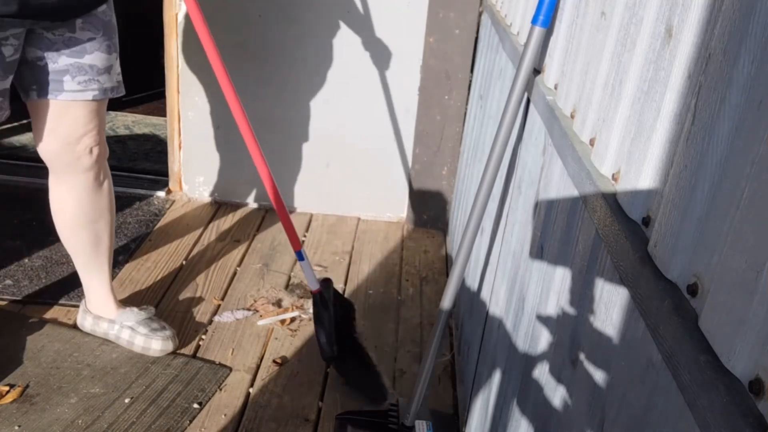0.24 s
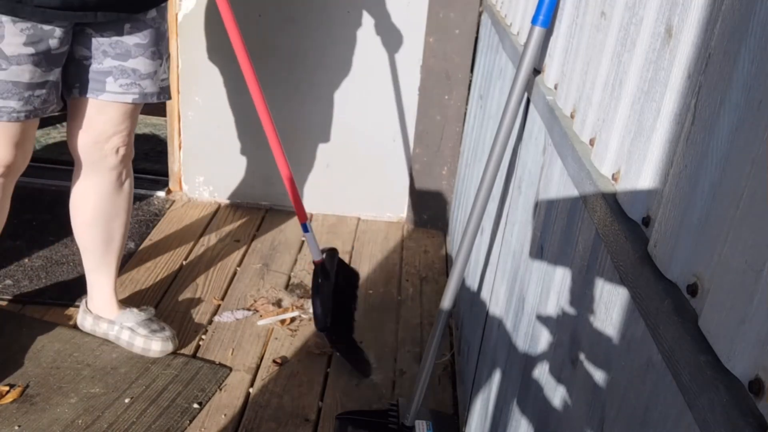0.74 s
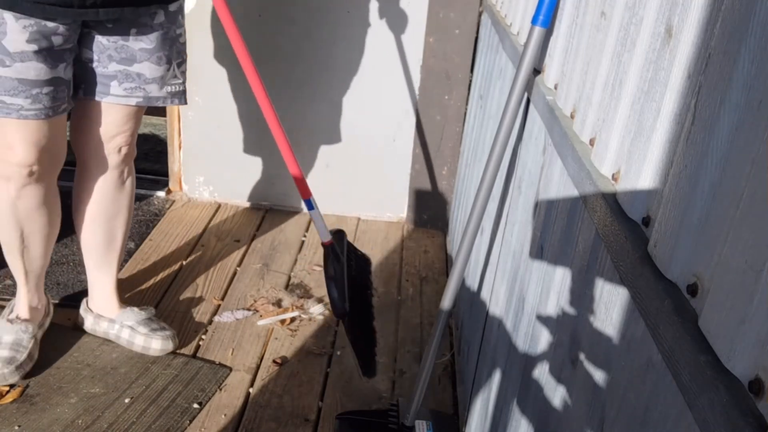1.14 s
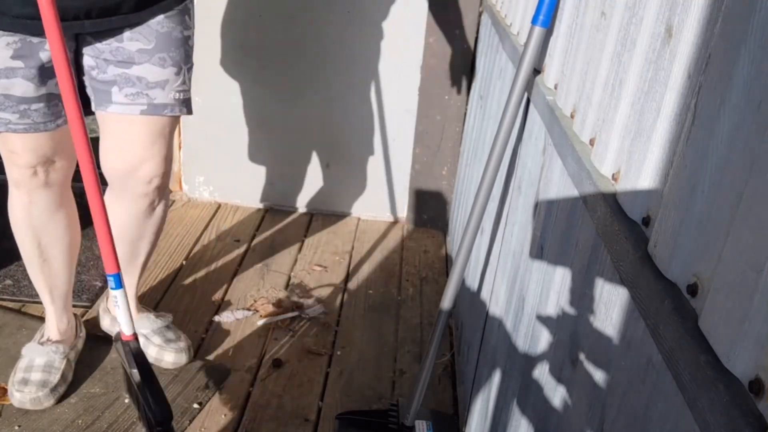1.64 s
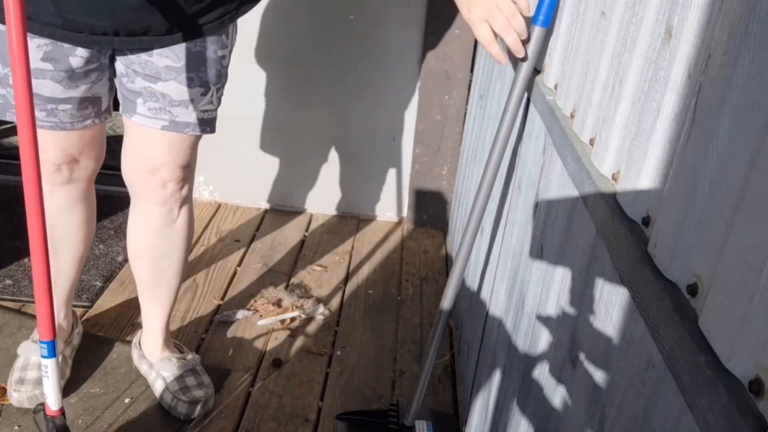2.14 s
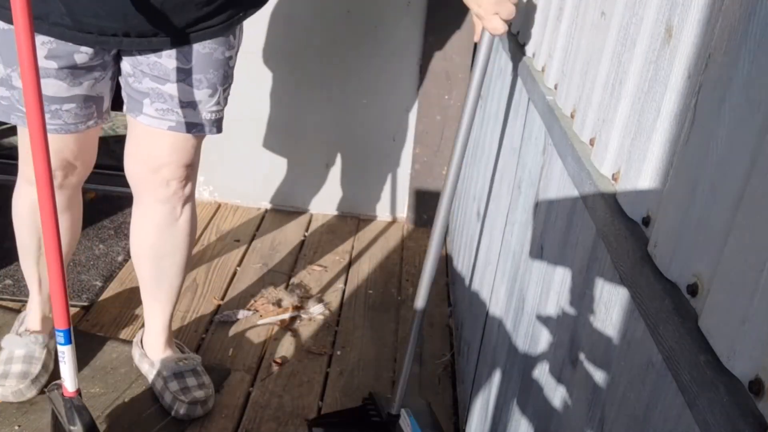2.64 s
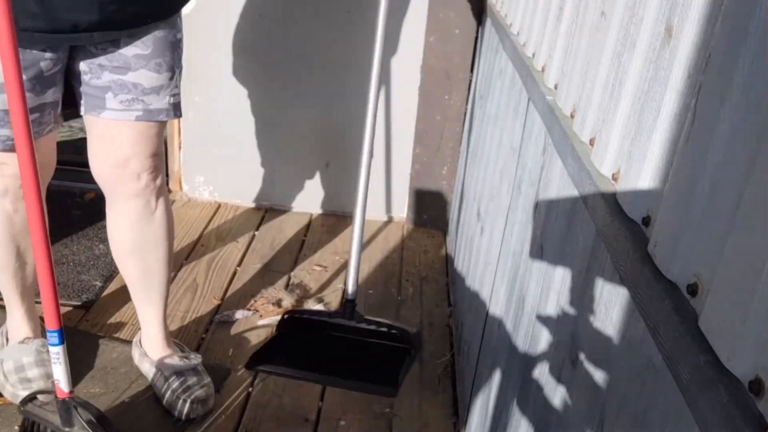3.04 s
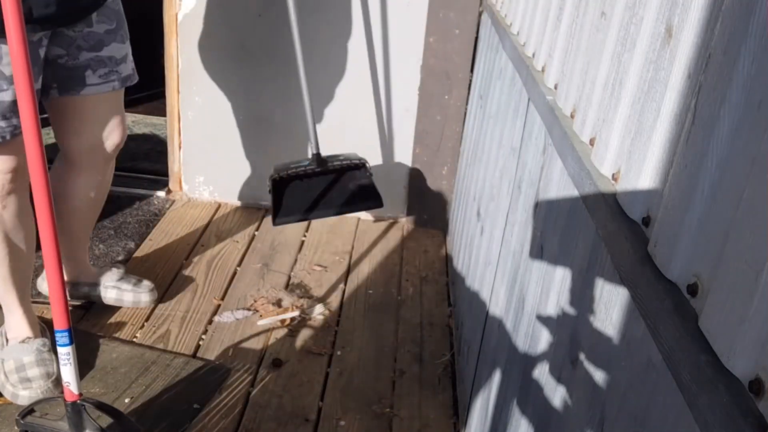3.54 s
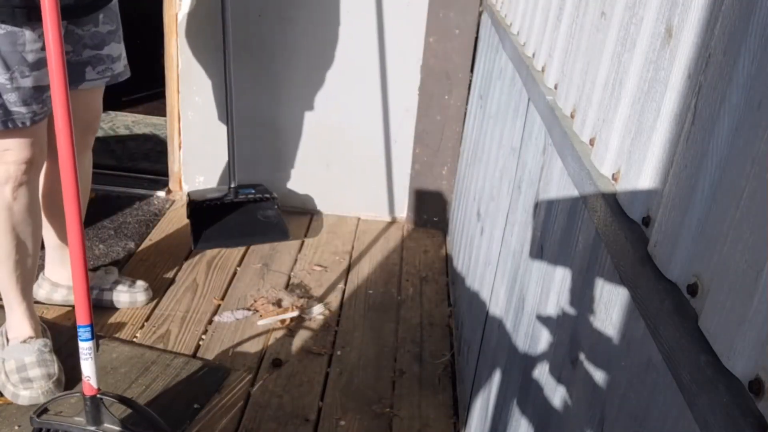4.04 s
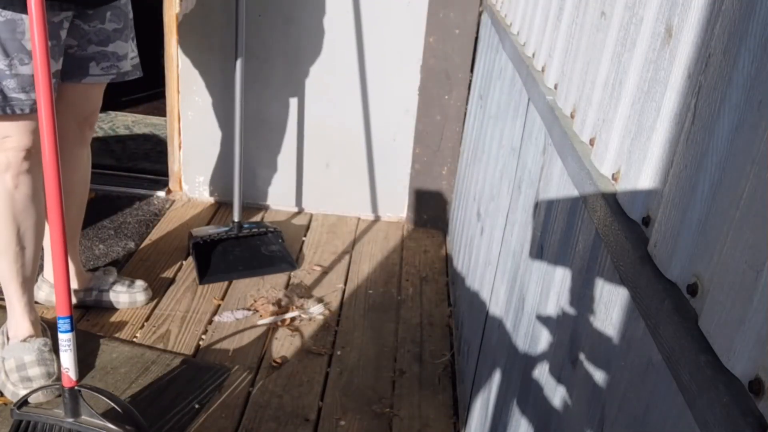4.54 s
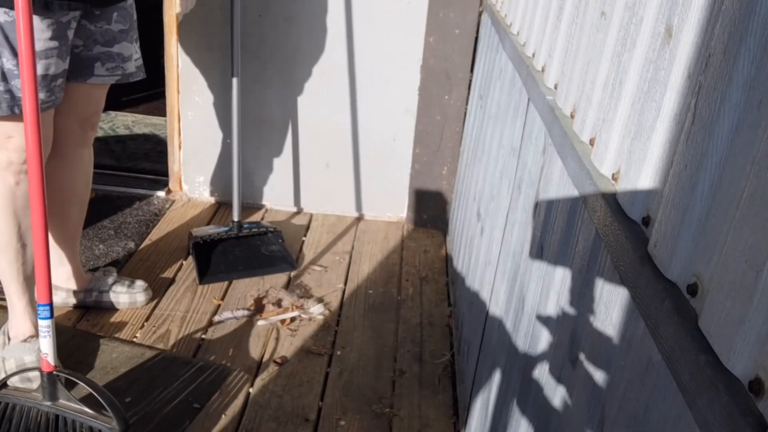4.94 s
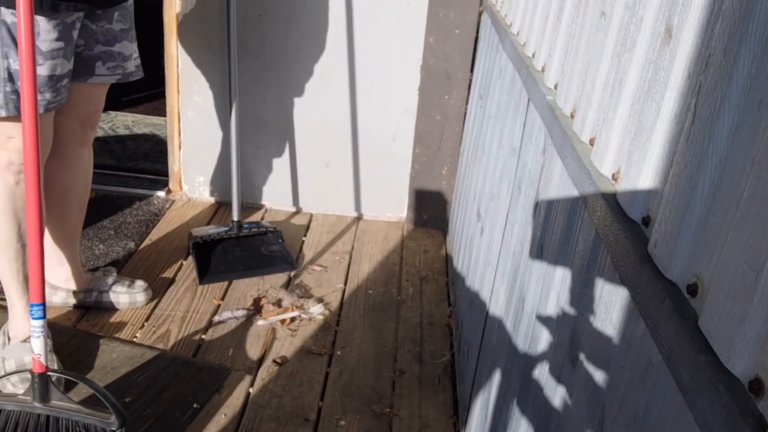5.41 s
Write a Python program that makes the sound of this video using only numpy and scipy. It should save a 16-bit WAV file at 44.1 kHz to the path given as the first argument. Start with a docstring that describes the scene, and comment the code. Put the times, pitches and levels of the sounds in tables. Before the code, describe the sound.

A broom knocks and hisses over gritty porch boards, then a plastic dustpan clatters while a songbird repeats a gliding whistle.

```python
"""On a porch, a broom lands twice, making the boards ring, and its bristles hiss over grit.
Slippers scuff, and a plastic dustpan clatters as it is picked up and set down. A songbird repeats
one gliding whistle that echoes among the trees, and another bird chirps twice far off. Behind it all
are the outdoor air, faint insect trills, a thin, far-off whistling call and a distant machine's hum."""
import sys
import numpy as np
from scipy import signal
from scipy.fft import rfft, irfft
from scipy.io import wavfile
from scipy.ndimage import uniform_filter1d

SR = 44100
rng = np.random.default_rng(int(sys.argv[2]) if len(sys.argv) > 2 else 0)


def wav_record(signal):
    """Record a signal, one row per channel, as 16-bit PCM in the file named by sys.argv[1]."""
    frames = np.transpose(np.atleast_2d(signal))
    bounded = np.clip(frames, -1, 1)
    # unit amplitude maps onto the largest positive 16-bit level
    quanta = np.round(bounded * 32767).astype(np.int16)
    wavfile.write(sys.argv[1], SR, quanta)


N = 250047
T = np.arange(N) / SR


def amp(db):
    """Turn decibels into a number to multiply by."""
    return 10 ** (np.asarray(db) / 20)


def rms_one(x):
    """Scale a sound to an average strength (rms) of 1."""
    return x / np.sqrt(np.mean(x ** 2) + 1e-20)


def at_hz(points, hz):
    """Read between the rows of a table, with octaves evenly spaced."""
    freqs, values = np.transpose(points)
    return np.interp(np.log(hz), np.log(freqs), values)


def drift(hz):
    """A random wobble of size about 1; more hz makes it quicker."""
    r = np.exp(-40 * np.pi * hz / SR)
    slow = signal.lfilter([1], [1, -2 * r, r * r], rng.standard_normal(N // 20 + 2002))[2000:]
    return np.interp(np.arange(N) / 20, np.arange(len(slow)), rms_one(slow))


# How alike the two ears hear each pitch: f/Hz, likeness (1 = the same)
EAR_LIKENESS = [(60, 1), (250, 0.96), (600, 0.74), (1500, .4), (4000, .25), (12000, 0.076)]
def stereo(mid, side, hz):
    """Make left and right from a shared part and an opposite part."""
    alike = at_hz(EAR_LIKENESS, hz)
    return np.sqrt(1 + alike) * mid + np.sqrt(1 - alike) * side * [[1], [-1]]


def coloured(spectrum, grain_db):
    """Stereo noise with a given tone colour; more grain_db makes it grittier."""
    hz = np.maximum(np.arange(N // 2 + 1) * SR / N, 10)
    grains = rng.standard_normal((2, N)) * amp(grain_db * np.minimum(rng.exponential(1, N), 5))
    mid, side = rfft(grains) * amp(at_hz(spectrum, hz))
    return rms_one(irfft(stereo(mid, side, hz), N))


def narrow(hz, width_hz):
    """Stereo noise filtered twice to stay close to one pitch."""
    r = np.exp(-np.pi * width_hz / SR)
    poles = [1, -2 * r * np.cos(2 * np.pi * hz / SR), r * r]
    once = signal.lfilter([1, 0, -1], poles, rng.standard_normal((2, N + SR)))
    mid, side = signal.lfilter([1], poles, once)[:, SR:]
    return rms_one(stereo(mid, side, hz))


def echoes(x, t60, wet_db, gap_s, band_hz, alike):
    """Many reflections blur into a tail; t60 is the time it takes to fade by 60 dB."""
    t = np.arange(int(t60 * SR)) / SR
    mid, side = rng.standard_normal((2, SR))[:, :len(t)] * amp(-60 * t / t60) * np.clip(t / gap_s, 0, 1)
    tail = mid + side * np.sqrt((1 - alike) / (1 + alike)) * [[1], [-1]]
    tail /= np.sqrt(np.sum(tail ** 2, axis=1, keepdims=True))
    band = signal.butter(2, band_hz, "band", fs=SR, output="sos")
    return amp(wet_db) * signal.sosfilt(band, signal.fftconvolve(x[None], tail)[:, :N])


def strike(blows, modes, spread_oct):
    """Each blow rings an object's own tones (modes), favouring those near the blow's pitch."""
    out, t = np.zeros(N), T[:SR // 2, None]
    f, db, t60 = np.transpose(modes)
    signs = (-1) ** np.arange(len(f))  # neighbouring tones start in opposite directions
    for start, blow_db, hz, contact, lasts in blows:
        gain = signs * amp(blow_db + db - 8.1 * (np.log2(f / hz) / spread_oct) ** 2)
        # after its ring time, each knock's tones above 120 Hz die away quickly
        damped = amp(-60 * np.maximum(t - lasts, 0) / 0.015 * (f > 120))
        ring = (gain * np.sin(2 * np.pi * f * t) * amp(-60 * t / t60) * damped).sum(axis=1)
        i = round(start * SR)
        out[i:i + len(t)] += (ring * np.clip(t[:, 0] / contact, 0, 1))[:N - i]
    return out


# Tone colour of the outdoor air: f/Hz, level/dB
AIR_COLOUR = [(15, -39), (25, -17), (64, -26.5), (102, -7), (160, -21.5), (217, -24.5), (300, -26.5),
              (480, -24), (900, -30.5), (1300, -40), (2500, -46), (4000, -48.5), (7000, -45),
              (10000, -54.5), (15500, -45)]
def air():
    """A soft, low rush that wavers a little."""
    return amp(-61 + drift(3)) * coloured(AIR_COLOUR, grain_db=0.5)


# Two faint insect trills, then a thin, far-off whistling call: f/Hz, width/Hz, list of (t/s, level/dB)
TRILLS_AND_CALL = [(4184, 570, [(0, -72), (1.5, -75), (3.5, -74.5), (4.0, -70.5), (4.5, -75.5),
                   (5.0, -73.5), (5.67, -76)]), (2920, 750, [(0, -110), (.9, -83), (1.2, -79.5),
                   (3.6, -100.5), (4.6, -91), (4.8, -77), (5.3, -80), (5.67, -87.5)]),
                   (5940, 70, [(3.42, -100), (3.5, -68.5), (3.6, -72.5), (3.7, -87), (3.8, -100)])]
def trills_and_call():
    """Each is a thin band of noise that flutters, swells and fades."""
    return sum(amp(np.interp(T, *np.transpose(levels)) + 1.5 * drift(50)) * narrow(hz, width)
               for hz, width, levels in TRILLS_AND_CALL)


# Pitches in the hum: f/Hz, width/Hz, level/dB
HUM_BANDS = [(60, 14, -66), (95, 12, -60), (120, 9, -61), (494, 12, -74)]
def machine():
    """A distant machine hums at a few low, blurry pitches."""
    return sum(amp(db) * narrow(hz, width) for hz, width, db in HUM_BANDS)


# Tone colours of the four rubbing noises: f/Hz, level/dB
HISS_COLOUR = [(900, -23), (1500, -12.5), (3000, -2), (5000, -2.5), (7400, 5.5), (10500, -1.5),
               (12500, -20.5)]
SIZZLE_COLOUR = [(9500, -30.5), (11200, 0), (15500, -0.5), (17000, -2.5)]
SCRAPE_COLOUR = [(350, -14.5), (550, -3), (900, -3), (1500, -7), (2500, -15.5), (4500, -28.5)]
RUMBLE_COLOUR = [(50, -19.5), (130, -3.5), (250, 3), (450, 12.5), (700, -36)]
# Sweeps, scuffs and drags: t/s, rise/s, hold/s, fade/s, hiss/dB, sizzle/dB, scrape/dB, rumble/dB
SWEEPS = [(0.11, 0.043, 0.021, 0.028, -48.5, -38.5, -45, -46), (0.13, .14, .02, .25, -47, -41.5, -46, -55),
          (0.52, .022, .03, 0.07, -64.5, -55, -87, -75), (0.642, 0.016, 0.11, 0.19, -51, -51, -74, -57.5),
          (0.679, 0.076, 0.011, 0.16, -61, -46.5, -50.5, -74),
          (1.206, 0.11, 0.09, .06, -68.5, -64.5, -81, -87), (1.335, 0.037, 0.015, 0.13, -70, -84, -47, -79),
          (1.408, 0.036, 0.016, 0.068, -55, -57, -70, -68),
          (1.795, 0.014, 0.014, 0.099, -46.5, -57, -43.5, -68),
          (2.291, 0.031, .021, 0.096, -95, -90, -45, -83),
          (2.356, 0.044, 0.0098, .11, -66.5, -78, -57, -55),
          (2.453, 0.087, 0.16, 0.042, -61, -60, -71, -67),
          (2.628, 0.021, 0.0023, 0.046, -53.5, -65, -51.5, -72),
          (2.693, .021, 0.1, 0.062, -70, -66, -65, -57.5),
          (2.908, 0.015, 0.0016, 0.15, -65.5, -69, -67, -76),
          (3.06, 0.017, .004, 0.17, -65.5, -77, -79, -56),
          (3.241, 0.048, .002, 0.078, -55.5, -77, -54.5, -90),
          (3.767, 0.036, .002, .13, -97, -104, -66.5, -67),
          (4.252, 0.033, .002, 0.062, -80, -67, -60.5, -69),
          (4.297, 0.027, 0.039, 0.11, -69, -52.5, -78, -87.5)]
# Grit and boards shaken by a knock: t/s, t60/s, hiss/dB, sizzle/dB, scrape/dB, rumble/dB
SHAKES = [(0.151, .2, -44.5, -40, -28.5, -42), (0.655, .18, -58, -58, -33, -36),
          (1.453, .19, -50, -48, -66, -70), (1.510, .26, -66, -69, -44.5, -49),
          (2.675, .09, -57, -63, -24.5, -26), (2.838, .3, -51, -51, -71, -63),
          (3.057, .18, -66, -74, -40, -53), (4.399, .08, -62, -62, -45, -49),
          (4.428, .23, -54, -60, -22, -28), (4.500, .18, -57, -53, -42, -42),
          (4.520, .9, -85, -85, -53, -60), (4.630, .4, -73, -80, -60, -66)]
def rubbing():
    """Bristles hiss and sizzle up high, while the boards scrape and rumble below."""
    power, t = np.zeros((4, N + SR)), T[:SR]
    for start, rise, hold, fade, *db in SWEEPS:
        fading = np.maximum((t - rise - hold) / fade, 0) ** 1.7
        shape = np.minimum(t / rise, 1) ** 1.4 * amp(-30 * fading)
        power[:, round(start * SR):][:, :SR] += np.outer(amp(db), shape) ** 2
    rise_s = 0.0057
    for peak, t60, *db in SHAKES:
        shape = np.minimum(t / rise_s, 1) * amp(-60 * t / t60)
        power[:, round((peak - rise_s) * SR):][:, :SR] += np.outer(amp(db), shape) ** 2
    hiss, sizzle, scrape, rumble = np.sqrt(power[:, :N])
    fine, coarse = amp(1.3 * drift(36) + 1.2 * drift(250)), amp(1.8 * drift(35))  # pressure wavers
    bright = hiss * amp(2.5) * coloured(HISS_COLOUR, 1.0) + sizzle * coloured(SIZZLE_COLOUR, 2.5)
    dull = scrape * coloured(SCRAPE_COLOUR, 1.5) + rumble * coloured(RUMBLE_COLOUR, 2.0)
    return fine * bright + coarse * amp(-3.5) * dull


# Bright clicks: t/s, level/dB, f/Hz
CLICKS = [(0.1186, -40.5, 9900), (0.1511, -22, 3430), (0.467, -46, 12500), (0.545, -50, 8100),
          (0.572, -46, 12000), (1.4536, -41, 7100), (2.6728, -52.5, 7200), (2.837, -32, 3880),
          (4.327, -48, 12900), (4.4247, -28, 3630), (4.446, -47, 3676), (4.5012, -40, 7050),
          (4.5825, -45, 4000), (4.6275, -51.5, 7190)]
def clicks():
    """Hard plastic and grit click in tiny bursts of noise."""
    out = np.zeros(N)
    for start, db, hz in CLICKS:
        burst = amp(db - 0.5 - 60 * T[:900] / 0.012) * rng.standard_normal(900)
        band = signal.butter(1, [hz / 1.6, min(hz * 1.3, 19000)], "band", fs=SR)
        out[round(start * SR):][:900] += signal.lfilter(*band, burst)
    return out


# Knocks on the boards: t/s, level/dB, f/Hz, contact/s, ring time/s
BOARD_KNOCKS = [(0.150, -20.5, 1510, 0.0014, .3), (0.160, -23, 760, 0.0041, .3),
                (0.650, -51, 790, 0.0041, .3), (0.661, -21.5, 704, 0.0036, .3),
                (0.664, -44.5, 191, 0.0021, 0.27), (1.345, -50, 990, 0.00049, .3),
                (1.508, -34.5, 600, 0.0016, .3), (1.814, -59, 1010, 0.0025, 0.23),
                (2.295, -51, 253, 0.0038, 0.21), (2.320, -35.5, 630, 0.012, .3),
                (2.335, -47.5, 243, 0.009, .3), (2.392, -58, 245, 0.0054, .3),
                (3.057, -77, 1210, 0.0016, 0.018), (3.062, -46, 390, 0.0025, .3),
                (3.852, -62.5, 605, 0.0068, 0.42), (4.629, -55, 1570, 0.00072, 0.078)]
# The boards' own tones: f/Hz, level/dB, t60/s
BOARD_TONES = [(159, 11, .15), (233.6, 0.5, 0.38), (341, -4, 0.3), (587, -9.5, 0.11), (710, -4.5, 0.075),
               (982, 1, 0.058), (1083, -8.5, 0.22), (1198, 2.5, 0.063), (1565, -1.5, 0.06),
               (1860, -12, 0.071), (2030, -9.5, 0.059), (3030, -13, 0.069), (3300, -24.5, 0.28)]
def boards():
    """Broom head and feet hit the boards, ringing a few tones at a time."""
    return strike(BOARD_KNOCKS, BOARD_TONES, spread_oct=0.53)


# Notes (a chip, a fall, a low note, two steps up):
# t/s, length/s, first f/Hz, last f/Hz, settling (more = sooner), level/dB, rise/s, change by the end/dB
PHRASE_NOTES = [(0, 0.037, 6550, 4860, 3.9, -50.5, 0.0097, -13.5),
                (0.041, .041, 4780, 2980, .68, -48, 0.0086, 4),
                (0.084, 0.096, 2940, 1930, 3.8, -47.5, 0.015, -35),
                (0.185, 0.0541, 2027, 2866, 5.14, -41, 0.011, -9.5),
                (0.234, 0.0775, 3216, 2910, 2.05, -44, 0.006, -34.5)]
def phrase(t):
    """Pitch and strength at times t into the bird's phrase; each note swells and glides."""
    hz, level = np.full(N, 3000.), np.full(N, -200.)
    for start, length, from_hz, to_hz, settles, db, rise, end_db in PHRASE_NOTES:
        on = (t >= start) & (t < start + length)
        done = (t[on] - start) / length
        hz[on] = to_hz + (from_hz - to_hz) * (1 - done) ** settles
        level[on] = db - 13 * np.maximum(1 - done * length / rise, 0) + end_db * done ** 3.8
    return hz, uniform_filter1d(amp(level), size=88)


# Repeats of the phrase: t/s, level/dB, extra on the high opening/dB, extra on the ending/dB
REPEATS = [(1.405, -4, -47, -0.5), (1.729, 3.5, -8.5, -6.5), (2.051, 2.5, -5.5, -3.5),
           (2.372, 3, -3.5, -3.5), (2.694, 3, -2, -4.5), (3.03, 1, -3, -7.5)]
def songbird():
    """A nearly pure, trembling whistle that buzzes up high and is hoarse as it falls."""
    out = np.zeros(N)
    for start, db, opening_db, end_db in REPEATS:
        t = T - start
        hz, gain = phrase(t)
        high = np.clip((hz - 4200) / 600, 0, 1)
        tremble = (0.0117 + 0.026 * (t < .095) + 0.0534 * high) * np.tanh(drift(208.3))
        phase = 2 * np.pi * np.cumsum(hz * (1 + tremble)) / SR
        overtones = amp(-40.5 + 18 * high) * np.sin(2 * phase)
        overtones += amp(-54 + 29.6 * (t < .075)) * np.sin(3 * phase)
        level = db + opening_db * high + end_db * (t > .19) + 3.68 * np.tanh(drift(64))
        out += gain * amp(level) * (np.sin(phase) + overtones)
    return out


def trees(song):
    """Trees send back short and long echoes, which moving leaves make flutter."""
    leaves = amp(2.17 * np.tanh([drift(34), drift(30)]))
    near = echoes(song, t60=0.26, wet_db=9, gap_s=0.004, band_hz=[1900, 12000], alike=0.37)
    far = echoes(song, t60=0.95, wet_db=-1, gap_s=0.008, band_hz=[2700, 4700], alike=0.15)
    return leaves * (near + far)


# Knocks on the dustpan: t/s, level/dB, f/Hz, contact/s, ring time/s
PAN_KNOCKS = [(2.673, -26.5, 600, 0.0035, 0.015), (2.685, -52.5, 430, 0.00095, 0.039),
              (4.397, -38, 550, 0.0014, 0.018), (4.426, -16, 556, 0.0035, 0.059),
              (4.430, -26, 64.6, 0.0037, .2), (4.445, -21, 900, 0.0011, 0.047),
              (4.463, -27.5, 700, .003, 0.0304), (4.500, -35.5, 800, 0.00098, 0.16)]
# The dustpan's own tones: f/Hz, level/dB, t60/s
PAN_TONES = [(51.8, -19, 0.4), (81, -18.5, 0.74), (92, -13, 0.33), (140, -11, .2), (225, -14, 0.12),
             (373, -15, 0.16), (539.2, 5, 0.095), (616.3, 1, 0.21), (711, -0.5, 0.05), (810, -14.5, 0.068),
             (995, -9, 0.096), (1110, -15, 0.23), (1264, -23, .2), (1627, -33, .15), (1887, -33, 0.084),
             (2920, -26, 0.033), (2752, -29, 0.08), (3150, -29.5, 0.087), (4120, -27.5, .08),
             (5400, -24, 0.043)]
def dustpan():
    """The plastic pan clatters: each knock rings many tones at once."""
    return strike(PAN_KNOCKS, PAN_TONES, spread_oct=4.43)


# The second bird's chirps: t/s, level/dB
FAR_CHIRPS = [(5.100, -60), (5.146, -61.5)]
def far_bird():
    """Each chirp shoots up in pitch, levels off and leaves a short echo."""
    from_hz, to_hz, rise_s, length_s = 5600, 7800, .0055, 0.018
    out, t = np.zeros(N), T[:round(length_s * SR)]
    hz = to_hz + (from_hz - to_hz) * np.exp(-t / rise_s)
    chirp = np.sin(np.pi * t / length_s) * np.sin(2 * np.pi * np.cumsum(hz) / SR)
    for start, db in FAR_CHIRPS:
        out[round(start * SR):][:len(t)] += amp(db) * chirp
    return out + echoes(out, t60=0.15, wet_db=4, gap_s=.008, band_hz=[5000, 9000], alike=.3)


def scene():
    """Sweeping and knocks close by in the porch corner, birds far off among trees."""
    ticks, knocks, song, pan = clicks(), boards(), songbird(), dustpan()
    floor = np.array([np.roll(knocks, shift=6), knocks])  # reaches the right ear first
    direct = floor * amp([[.5], [-.5]]) + pan * amp([[-.6], [.6]]) + ticks
    corner = echoes(knocks + pan + ticks, t60=0.33, wet_db=-10, gap_s=.004,
                    band_hz=[300, 14000], alike=.05)
    background = air() + trills_and_call() + machine()
    return background + rubbing() + direct + corner + song + trees(song) + far_bird()


def record(dry):
    """Cut away the very highest treble."""
    stop_hz = 16100
    return signal.sosfilt(signal.cheby2(16, 60, stop_hz, fs=SR, output="sos"), dry)


dry = scene()
out = record(dry)
wav_record(out)
```